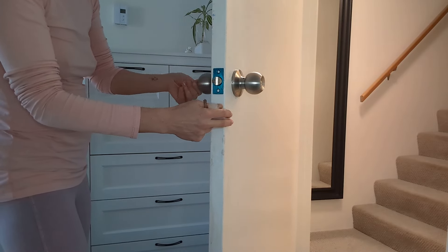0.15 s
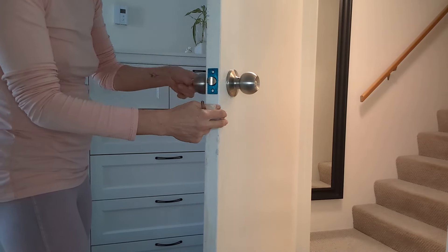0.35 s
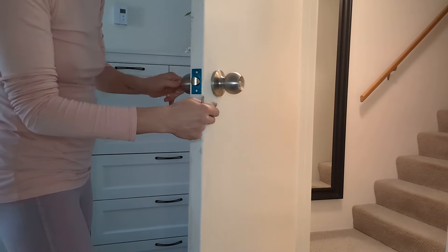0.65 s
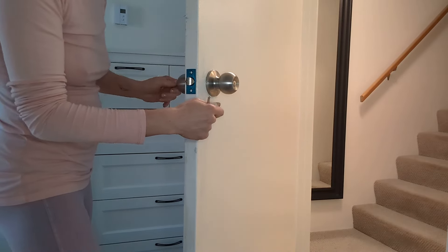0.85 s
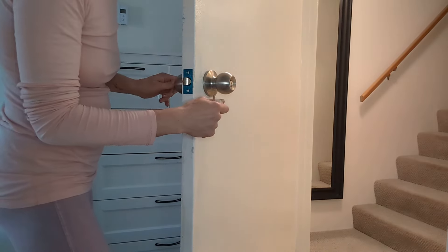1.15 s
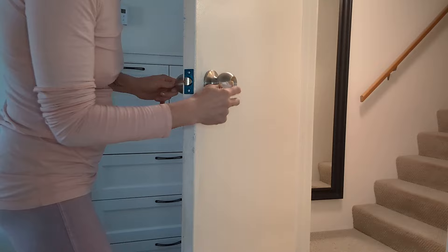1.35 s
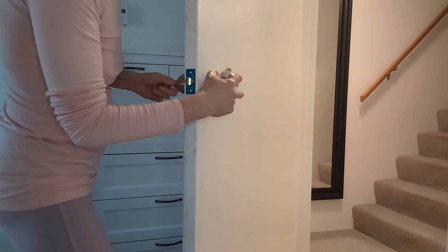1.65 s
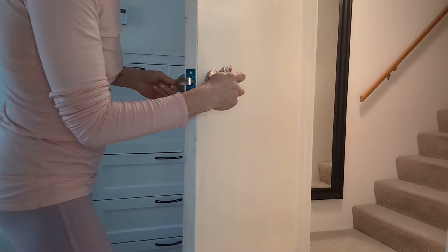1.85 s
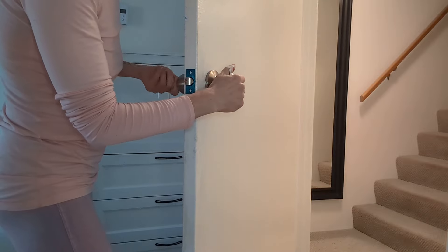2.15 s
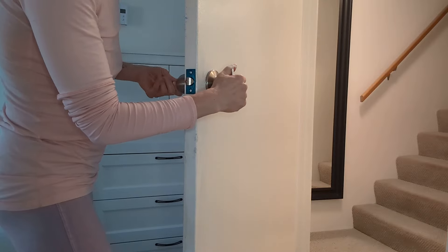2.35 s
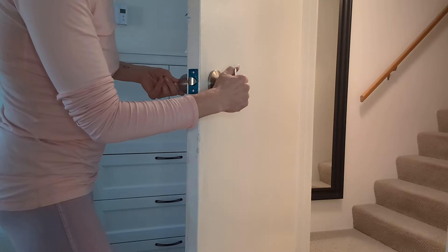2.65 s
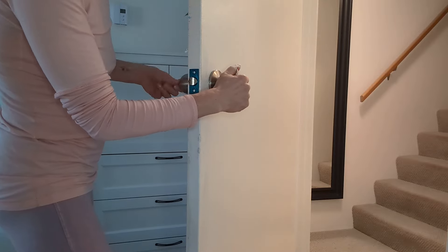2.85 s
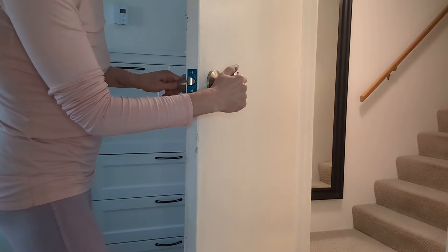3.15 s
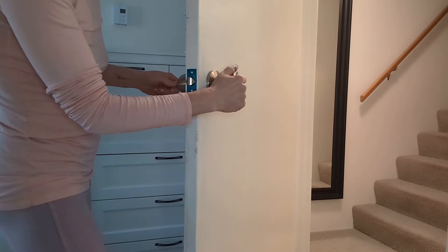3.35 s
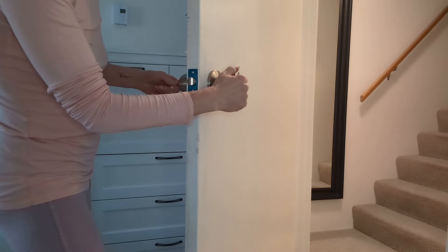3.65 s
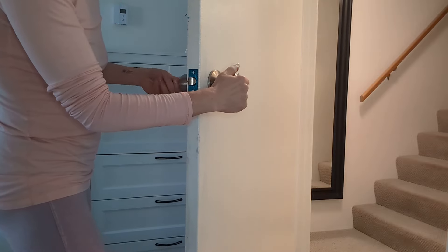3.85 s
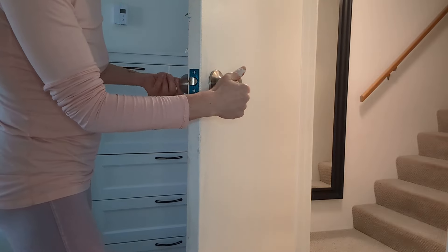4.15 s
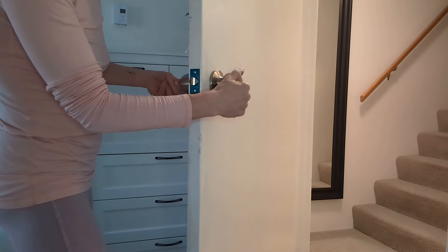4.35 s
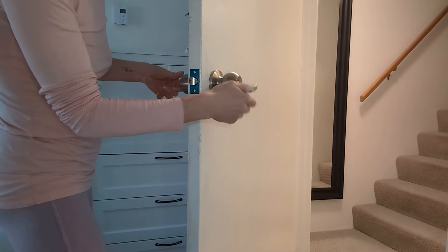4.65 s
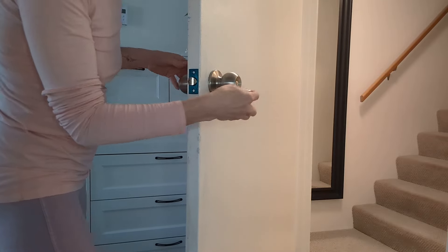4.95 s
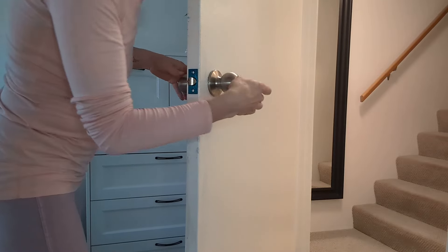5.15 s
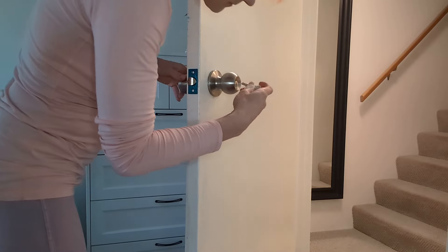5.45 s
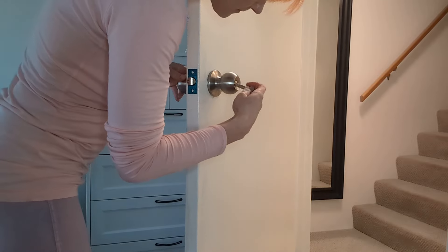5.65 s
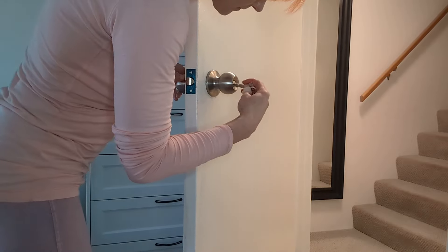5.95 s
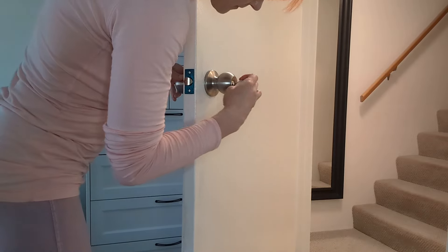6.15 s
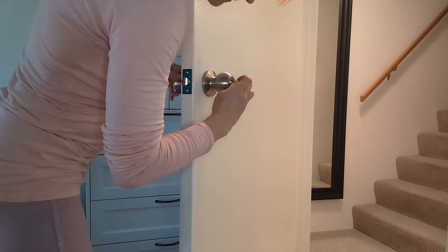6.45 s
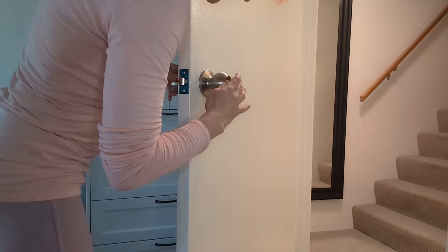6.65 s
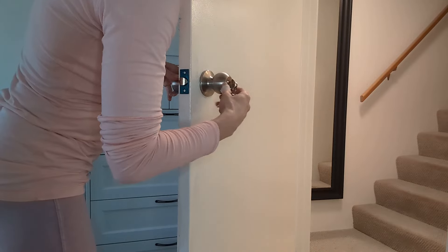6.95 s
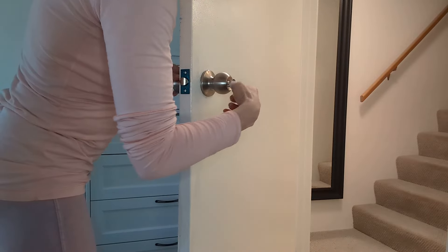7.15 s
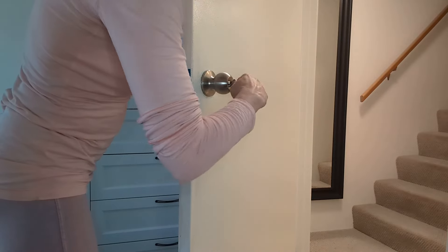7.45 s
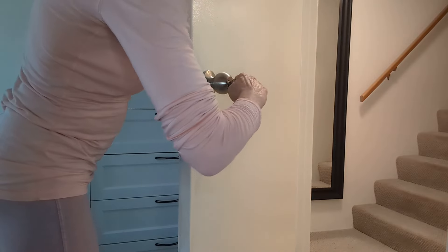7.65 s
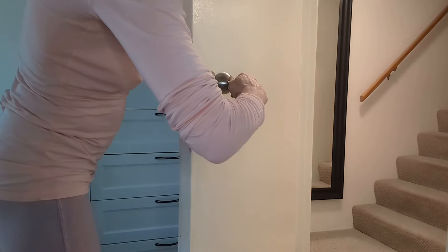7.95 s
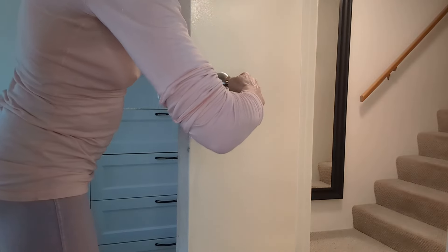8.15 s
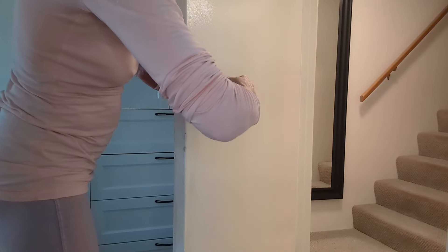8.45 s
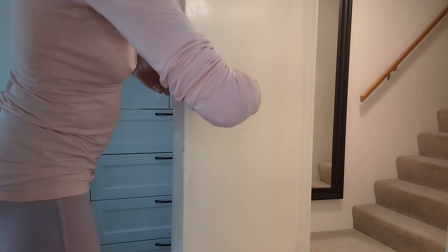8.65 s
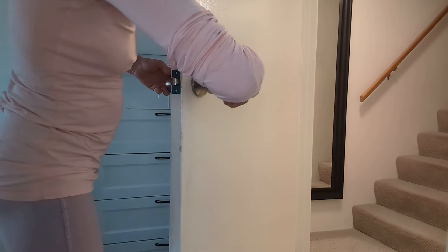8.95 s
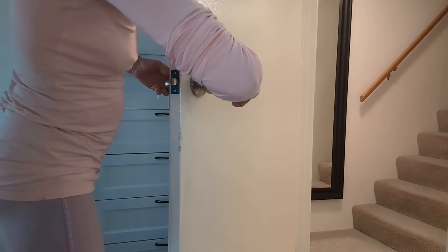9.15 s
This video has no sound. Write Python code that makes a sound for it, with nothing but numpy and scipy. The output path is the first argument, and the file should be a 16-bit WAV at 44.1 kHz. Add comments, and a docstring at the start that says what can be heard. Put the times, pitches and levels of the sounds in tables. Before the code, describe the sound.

Quiet indoor door lock handling: soft wooden knob knocks, small key ticks, a sudden bright key jangle with thuds, then snaps and final rattles.

```python
"""A door knob knocks softly over a low hum and faint hiss: someone tries it in a hallway, its spindle and
latch loose in the wooden door, grinding as they turn, and keys on a ring tick against it.
A key rasps over the lock's pins, the bunch jangles, the door thuds and the locking bar snaps over.
Knocks, ticks and snaps are ringing modes and decaying noise; rasps and scrapes are runs of small contacts;
thuds are swelling noise around one pitch; coloured noise makes the house, diffuse noise the hallway's echo."""
import sys
import numpy as np
from scipy import signal
from scipy.fft import rfft, irfft
from scipy.io import wavfile

SR = 44100
rng = np.random.default_rng(int(sys.argv[2]) if len(sys.argv) > 2 else 0)


def unload_wav(signal):
    """Save mono or channel-first audio to the path in sys.argv[1] as 16-bit WAV at rate SR, clipped to [-1, 1]."""
    wavfile.write(
        sys.argv[1],
        SR,
        np.round(np.clip(np.atleast_2d(signal).T, -1, 1) * 32767).astype(np.int16),
    )


N = 409688  # length in samples
AGE = np.arange(SR // 2) / SR  # time since a contact, s
LEVEL_WINDOW_S = 0.02  # short sounds are levelled to the energy of this window

# metal sliding and chattering on metal: [t/s, length/s, level/dB, keys over rasp/dB,
# struck part over rasp/dB, f of the struck part/Hz]
KEY_SLIDES = [(1.586, 0.0061, -47.5, -10, 14, 6450), (1.709, 0.049, -50, -26, 4.5, 6830),
              (5.034, 0.022, -54.5, -11, 2, 2238), (5.609, 0.0053, -34.5, -6, 20, 8240),
              (5.747, 0.038, -51.5, -23, 1, 6780), (6.638, 0.011, -26, -3.5, -10, 4530),
              (6.653, 0.006, -19.5, 1, -11, 3720), (6.671, 0.017, -17, 9, -12.5, 7000),
              (6.716, .12, -42.5, 11, -6, 5320), (6.773, 0.007, -38.5, 6.5, -4.5, 3830),
              (6.87, 0.021, -34, 15, 1, 6700), (6.928, 0.033, -39, -3, -25.5, 4540),
              (6.964, .011, -29, -5, -11, 5130), (6.976, 0.02, -26, 4.5, 9, 10340),
              (7.09, 0.012, -30, 12.5, 19.5, 6600)]
# keys and their ring: [f/Hz, level/dB]
KEY_RING_MODES = [(4560, -9), (5320, -8), (5900, -11), (6620, -11), (6750, -12), (8020, -13), (8570, -14),
                  (9020, -13), (10320, 2), (10680, -9), (11010, -8), (11190, -5), (12050, -11),
                  (13740, -12), (14280, -10), (14643, 1), (15310, -5), (15390, -7)]
KEY_T60_S = 0.09  # ringing time of the keys, held in the fingers
# colour of the lock's dense ring: [f/Hz, level/dB per Hz]
LOCK_COLOUR = [(500, -8), (2000, -1), (3800, -8), (5200, -2.5), (6000, -2.5), (6650, 6), (7400, -9),
               (8400, 1.5), (9600, -5.5), (10500, 8.5), (12500, -3), (15300, -5.5), (16200, -27)]
# colour of the knob and door wood: [f/Hz, level/dB per Hz]
KNOB_COLOUR = [(80, -3.5), (250, -13), (450, -10), (750, -3), (1200, -2.5), (1900, -3.5), (2800, -10),
               (4500, -16.5), (8000, -17), (16000, -39.5)]
# clear modes of knob, spindle and the wood around them: [f/Hz, level/dB]
KNOB_RING_MODES = [(330, -10.5), (615, 0), (735, -7.5), (830, -10), (925, 0), (1130, 6), (1400, 11),
                   (1640, 8), (1980, -6)]


def from_db(db):
    """Decibels to gain."""
    return 10 ** (np.asarray(db) / 20)


def at_hz(points, hz):
    """Read a table on a log-frequency axis."""
    f, value = np.transpose(points)
    return np.interp(np.log(np.maximum(hz, 1)), np.log(f), value)


def fade(t60):
    """Exponential decay, 60 dB down after t60 seconds."""
    return np.exp(-np.log(1000) * AGE / max(t60, 1e-3))


def unit(x):
    """Scale a short sound to the energy of one level window at rms 1."""
    energy = np.mean(np.sum(np.abs(x) ** 2, axis=-1))
    return x / np.sqrt(energy / (LEVEL_WINDOW_S * SR) + 1e-20)


def noise(colour, size, shelf_db=0, shelf_hz=9000):
    """Stereo noise of a given colour with a treble shelf, alike in both ears in the bass; rms 1."""
    # left-right likeness: [f/Hz, correlation]
    likeness = [(60, .98), (280, .75), (550, .5), (1200, .15), (4000, 0)]
    hz = np.fft.rfftfreq(size, 1 / SR)
    mid, side = rfft(rng.standard_normal((2, size)))
    alike = np.clip(at_hz(likeness, hz), -.99, .99)
    shelf = 1 - 1 / (1 + (hz / shelf_hz) ** 4)
    gain = from_db(at_hz(colour, hz) + shelf_db * shelf)
    stereo = np.sqrt(1 + alike) * mid + np.sqrt(1 - alike) * side * [[1], [-1]]
    x = irfft(gain * stereo, size)
    return x / x.std()


def add(track, s, sound, pan_db=0):
    """Mix a short stereo sound in at time s; a negative pan leans right."""
    i = round(s * SR)
    panned = sound * from_db([[pan_db / 2], [-pan_db / 2]])
    track[:, max(i, 0):i + len(AGE)] += panned[:, max(-i, 0):N - i]


def mode(hz, t60):
    """One damped vibration, as a rotating phasor."""
    return np.exp(2j * np.pi * hz * AGE) * fade(t60)


def radiate(modes, level_db, spread_db=11.5):
    """Each contact excites each mode with its own strength; each ear gets its own phase."""
    strength = from_db(level_db + spread_db * rng.standard_normal(len(modes)))
    phase = np.exp(2j * np.pi * rng.random((2, len(modes))))
    return unit(((strength * phase) @ modes).real)


def seat(sound, rebound_db, rebound_s=0.007, rebound_count=2):
    """A loose part seats: the main blow, then weaker and weaker rebounds at uneven gaps."""
    out = sound.copy()
    gaps = rebound_s * rng.uniform(.5, 1.5, rebound_count)
    for k, delay in enumerate(np.cumsum(gaps), 1):
        i = round(delay * SR)
        out[:, i:] += from_db(k * rebound_db) * sound[:, :len(AGE) - i]
    return out


def chatter(depth_db, step_s=0.004):
    """Uneven gain of a part that rattles while it rings, drawn anew at every step."""
    knots = np.arange(0, AGE[-1] + step_s, step_s)
    wander = rng.standard_normal(1000)[:len(knots)]
    return from_db(depth_db * np.interp(AGE, knots, wander))


def contacts(length, per_s, uneven_db, count=1):
    """A run of uneven touches, with strengths of their own for each of count resonances."""
    number = max(int(length * per_s), 2)
    order = np.arange(number)
    jitter = rng.random(number) * (order > 0)  # the first touch falls at once
    at = (order + jitter) * length / number
    strength = from_db(uneven_db * rng.uniform(-1, 1, number)) * rng.standard_normal((count, number))
    touches = np.zeros((count, int(length * SR) + 1))
    touches[:, (at * SR).astype(int)] = strength
    return touches


def driven(response, touches):
    """The sound of a body under a run of touches: its response repeated at each of them."""
    return unit(signal.fftconvolve(np.atleast_2d(response), touches, axes=1)[:, :len(AGE)])


def house(hiss_db=-68.5, hum_db=-62.5):
    """The steady air of the house: faint broadband hiss and a low hum, both coloured noise."""
    # colours of the hiss and the hum: [f/Hz, level/dB per Hz]
    hiss_colour = [(100, 8), (170, 4), (210, -2), (320, -1), (520, -7), (900, -8), (1550, -2.5),
                   (3000, -5.5), (4500, -8.5), (7000, -6), (10000, -17), (16000, -39)]
    hum_colour = [(30, -30), (48, -14.5), (56, 4), (66, -11.5), (100, -17), (300, -53)]
    hiss = from_db(hiss_db) * noise(hiss_colour, N)
    hum = from_db(hum_db) * noise(hum_colour, N)
    return hiss + hum


def hallway(x, build_t60=0.021):
    """Diffuse reflections build up quickly and die sooner in the treble."""
    # ringing time of the hallway: [f/Hz, t60/s]
    hall_t60 = [(150, 0.5), (1000, 0.5), (4000, 0.3), (9000, 0.19)]
    edges, tail = np.geomspace(60, 17000, 9), 0
    white = noise([(20, 0), (20000, 0)], len(AGE))
    for low, high in zip(edges, edges[1:]):
        bandpass = signal.butter(2, [low, high], "band", fs=SR, output="sos")
        band = signal.sosfilt(bandpass, np.roll(white, int(high), axis=1))
        tail = tail + band * fade(at_hz(hall_t60, np.sqrt(low * high)))
    tail = tail * (1 - fade(build_t60))
    tail = tail / np.sqrt(np.sum(tail ** 2) / 2)  # unit energy per ear
    return signal.fftconvolve(x, tail, axes=1)[:, :N]


def thuds(skirt_db=-18.0, rise_t60=0.067, t60_s=0.29, t60_at_hz=245.5, damping_slope=0.89):
    """Jolts swell a cluster of modes of the door or of its lock case; the low ones last longest."""
    # the door leaf and the lock case, jolted: [t/s, level/dB, f/Hz]
    jolts = [(1.097, -53, 78.6), (5.967, -46, 80.4), (6.176, -41, 230), (6.245, -48, 156),
             (6.415, -44.5, 280), (6.47, -44.5, 167.3), (6.534, -36.5, 58.2), (6.674, -36, 253.6),
             (6.687, -42.5, 134), (6.742, -34, 55.5), (6.874, -48, 1110), (6.974, -34.5, 1140),
             (7.869, -48, 54.7), (9.225, -55, 162)]
    out = np.zeros((2, N))
    for s, level_db, hz in jolts:
        cluster = [(hz / 4, 1.5 * skirt_db), (hz / 1.3, skirt_db / 2), (hz, 0),
                   (hz * 1.3, skirt_db / 2), (hz * 10, 3 * skirt_db)]
        decay = fade(t60_s * (t60_at_hz / hz) ** damping_slope)
        swell = decay * (1 - fade(rise_t60))
        add(out, s, from_db(level_db) * unit(noise(cluster, len(AGE)) * swell))
    return out


def scrapes(slips_per_s=190, uneven_db=3.5, body_t60=0.026, modes_t60=.05, modes_db=-4.5, pan_db=-0.5):
    """Dry metal sticks and slips as the knob turns; each slip is a small grain in the knob."""
    # knob and spindle grinding: [t/s, length/s, level/dB]
    grinds = [(0.975, 0.13, -62.5), (1.68, 0.13, -67.5), (1.9, 0.2, -64.5), (2.121, 0.29, -70),
              (5.965, 0.1, -59.5), (6.121, .24, -66.5), (6.429, .12, -64.5), (9.015, 0.063, -61),
              (9.237, 0.033, -58)]
    out, (knob_hz, knob_db) = np.zeros((2, N)), np.transpose(KNOB_RING_MODES)
    modes = np.array([mode(hz, modes_t60) for hz in knob_hz])
    for s, length, level_db in grinds:
        slips = contacts(length, slips_per_s, uneven_db, count=len(knob_hz))
        slips = slips * signal.windows.tukey(slips.shape[1], .5)  # eases in and out
        grit = driven(noise(KNOB_COLOUR, len(AGE)) * fade(body_t60), slips[:1])
        ring = radiate(driven(modes, slips), knob_db, spread_db=3.5)
        scrape = unit(grit + from_db(modes_db) * ring)
        longer = np.sqrt(length / LEVEL_WINDOW_S)  # a longer scrape carries more energy
        add(out, s, from_db(level_db) * longer * scrape, pan_db)
    return out


def knocks(sustain_db=-3.0, rise_t60=0.016, chatter_db=4.5, rebound_db=-13.5, pan_db=-0.5, bass_hz=800,
           body_t60=.15, ring_t60=.2, ring_db=-6, spread_db=5, plain_bass_db=-10, slide_jolt_db=-23.5):
    """Play in the spindle and latch knocks the knob on the door: a few clear modes over many close ones."""
    # knob and latch knocks: [t/s, level before sustain_db/dB, share of the bass/dB]
    knob_knocks = [(0.011, -52.5, -23), (0.739, -56, -7), (0.784, -51, -1.5), (0.809, -54, 20),
                   (0.977, -53.5, -20), (1.075, -55.5, -7), (1.109, -52, -12), (1.473, -58.5, -3.5),
                   (1.563, -50.5, -5), (1.959, -54, 1), (2.114, -57, -23), (2.234, -55, -15),
                   (3.186, -49, -30), (3.297, -53, -29), (3.836, -55.5, -16), (3.933, -51, -8.5),
                   (4.046, -52.5, -14), (4.4, -59.5, -7.5), (4.614, -54, -4), (5.61, -49, 1.5),
                   (5.903, -53, -7), (6.036, -55.5, -5), (6.391, -48, 7.5), (6.413, -44, -9.5),
                   (6.483, -47.5, 4.5), (6.93, -46, -35), (7.175, -52.5, -10), (7.322, -49.5, -7.5),
                   (7.437, -52, 2), (7.739, -44, -4.5), (7.779, -49.5, -2), (9.008, -55.5, -12),
                   (9.083, -48, -5), (9.213, -44.5, -9), (9.238, -40, -5.5)]
    out, (knob_hz, knob_db) = np.zeros((2, N)), np.transpose(KNOB_RING_MODES)
    modes = np.array([mode(hz, ring_t60) for hz in knob_hz])
    # each slide also knocks the knob as it ends
    jolts = [(s + length, db + slide_jolt_db, plain_bass_db) for s, length, db, *_ in KEY_SLIDES]
    for s, level_db, share_db in [*knob_knocks, *jolts]:
        bass_db = share_db - plain_bass_db
        # in the body, more bass means less of everything above it
        body = unit(noise(KNOB_COLOUR, len(AGE), -bass_db, bass_hz) * fade(body_t60))
        ring = from_db(ring_db) * radiate(modes, knob_db + bass_db * (knob_hz < bass_hz), spread_db)
        swell = 1 - fade(rise_t60)
        knock = from_db(level_db + sustain_db) * unit((body * chatter(chatter_db) + ring) * swell)
        add(out, s, seat(knock, rebound_db), pan_db)
    return out


def clinks(rise_t60=0.063, free_t60=.07, pan_db=-4.0):
    """A key that swings free rings with clear notes; the split ring, shaken with the bunch, sings on longer."""
    # a hanging key swings against the knob: [t/s, level/dB]
    swings = [(6.876, -39), (6.982, -24.5)]
    # that key's notes: [f/Hz, level/dB]
    free_key_modes = [(4550, 0), (5275, -4), (5873, -14)]
    split_ring_s, split_ring_db, split_ring_hz, split_ring_t60 = 6.69, -42.5, 5320, .5
    out = np.zeros((2, N))
    key_hz, key_db = np.transpose(free_key_modes)
    notes = np.array([mode(hz, free_t60) for hz in key_hz]) * (1 - fade(rise_t60))
    for s, level_db in swings:
        add(out, s, from_db(level_db) * radiate(notes, key_db, spread_db=0.5), pan_db)
    split_ring = radiate(mode(split_ring_hz, split_ring_t60)[None], 0)
    add(out, split_ring_s, from_db(split_ring_db) * split_ring, pan_db)
    return out


def snaps(crack_db=-5.0, crack_t60=0.0063, body_db=0.0, body_t60=0.057, ring_t60=0.099,
          rebound_db=-6.5, pan_db=-0.5):
    """The locking bar strikes its stop with a crack and rings with metallic notes, the high ones shortest."""
    # the turning key lets the locking bar snap over: [t/s, level/dB]
    bar_strikes = [(8.8281, -44.5), (8.8762, -41.5)]
    # the locking bar: [f/Hz, level/dB]
    bar_modes = [(3235, -14), (4527, -5), (5329, -5), (5950, -3), (6615, -3.5), (10420, 11.5), (11140, 8),
                 (13240, 3), (14550, 4), (15370, 8)]
    out, (bar_hz, bar_db) = np.zeros((2, N)), np.transpose(bar_modes)
    modes = np.array([unit(mode(hz, ring_t60 * np.sqrt(bar_hz[0] / hz))) for hz in bar_hz])
    for s, level_db in bar_strikes:
        decay = from_db(crack_db) * fade(crack_t60) + from_db(body_db) * fade(body_t60)
        crack = noise(LOCK_COLOUR, len(AGE)) * decay
        ring = radiate(modes, bar_db, spread_db=0.0)
        add(out, s, from_db(level_db) * seat(crack + ring, rebound_db), pan_db)
    return out


def slides(contacts_per_s=450, uneven_db=4.0, rasp_t60=.105, part_t60=0.058, grip_detune=0.0021,
           twin_ratio=1.02, twin_db=-9, pan_db=-5.0):
    """The key's teeth trip the pins in a quick uneven run; fingers damp the ringing."""
    out, (key_hz, key_db) = np.zeros((2, N)), np.transpose(KEY_RING_MODES)
    for s, length, level_db, keys_db, part_db, part_hz in KEY_SLIDES:
        touches = contacts(length, contacts_per_s, uneven_db, count=len(key_hz))
        rasp = driven(noise(LOCK_COLOUR, len(AGE)) * fade(rasp_t60), touches[:1])
        keys = []
        for hz, own_touches in zip(key_hz, touches):
            gripped_hz = hz * (1 + grip_detune * rng.standard_normal())  # notes shift with the grip
            keys.append(driven(mode(gripped_hz, KEY_T60_S), own_touches[None]))
        ring = radiate(np.vstack(keys), key_db, spread_db=1.0)
        # the struck part rings with a second note close by
        notes = [driven(mode(hz, part_t60), touches[:1]) for hz in (part_hz, part_hz * twin_ratio)]
        part = radiate(np.vstack(notes), np.array([0, twin_db]), spread_db=5.0)
        slide = unit(rasp + from_db(keys_db) * ring + from_db(part_db) * part)
        add(out, s, from_db(level_db) * slide, pan_db)
    return out


def clicks(crack_db=-7.5, crack_t60=0.00705, sustain_db=-8.5, body_db=-3.0, body_t60=0.099, keys_db=-14.5,
           part_db=-13.0, part_t60=0.077, twin_ratio=1.2, twin_db=-6.0, rebound_db=-15.0, pan_db=-2.0,
           cylinder_hz=6630, cylinder_scatter=0.0079, plain_treble_db=-7.5):
    """A hard tick, the dense short ring of the lock, the keys' clear modes and the cylinder's twin notes."""
    # key and pin clicks: [t/s, level before the layers' own levels/dB, share of the treble/dB]
    key_clicks = [(0.657, -48, -31), (0.782, -46, -16.5), (1.1088, -44, -25), (1.588, -47, -28),
                  (1.883, -47, -24), (2.97, -49, -40), (3.1862, -46.5, -51), (3.6098, -47, -22),
                  (4.158, -39, -1.5), (4.224, -34, 3), (4.643, -53, -18), (4.775, -46, -41),
                  (5.006, -54, -12), (5.2906, -49.5, -24), (5.3503, -50, -15), (5.5865, -46, -32),
                  (5.6115, -33, 1), (5.7893, -51, -25), (6.1535, -46, -17), (6.408, -38.5, -9.5),
                  (6.477, -39.5, 1.5), (6.642, -19, -4), (6.675, -19, -4.5), (6.862, -37.5, 6.5),
                  (6.8745, -30.5, 6), (6.979, -23.5, -8.5), (7.064, -31, 5), (7.092, -25, 17),
                  (7.3215, -43.5, -6), (7.3732, -40.5, 4.5), (7.526, -46.5, -11), (9.0955, -38, -1),
                  (9.209, -37.5, 7.5)]
    out, (key_hz, key_db) = np.zeros((2, N)), np.transpose(KEY_RING_MODES)
    keys = np.array([unit(mode(hz, KEY_T60_S)) for hz in key_hz])
    for s, level_db, share_db in key_clicks:
        treble_db = share_db - plain_treble_db
        hz = cylinder_hz * (1 + cylinder_scatter * rng.standard_normal())
        crack = from_db(crack_db) * noise(LOCK_COLOUR, len(AGE), treble_db) * fade(crack_t60)
        body = from_db(body_db) * unit(noise(LOCK_COLOUR, len(AGE), treble_db) * fade(body_t60))
        ring = from_db(keys_db) * radiate(keys, key_db + treble_db * (key_hz > 9500))
        twins = np.array([mode(hz, part_t60), mode(hz * twin_ratio, part_t60)])
        # the brighter the click, the less of the cylinder in it
        part_gain = from_db(part_db) / np.hypot(1, from_db(treble_db))
        part = part_gain * radiate(twins, np.array([0, twin_db]), spread_db=5)
        click = from_db(level_db) * (crack + from_db(sustain_db) * (body + ring + part))
        add(out, s, seat(click, rebound_db), pan_db)
    return out


def scene(click_room_db=-5.0, slide_room_db=-17.5, knock_room_db=-6.0):
    """Lock, door and hallway over the steady sound of the house."""
    ticks = clicks() + snaps()
    rasps = slides()
    wood = knocks() + scrapes()
    room = hallway(from_db(click_room_db) * ticks + from_db(slide_room_db) * rasps
                   + from_db(knock_room_db) * wood)
    return ticks + rasps + clinks() + wood + thuds() + room + house()


def record(dry, low_cut_hz=36, cutoff_hz=16000):
    """The microphone loses the deepest bass; the top is cut steeply."""
    low_cut = signal.butter(4, low_cut_hz, "high", fs=SR, output="sos")
    top_cut = signal.ellip(10, .3, 80, cutoff_hz, fs=SR, output="sos")
    return signal.sosfilt(top_cut, signal.sosfilt(low_cut, dry))


dry = scene()
out = record(dry)
unload_wav(out)
```